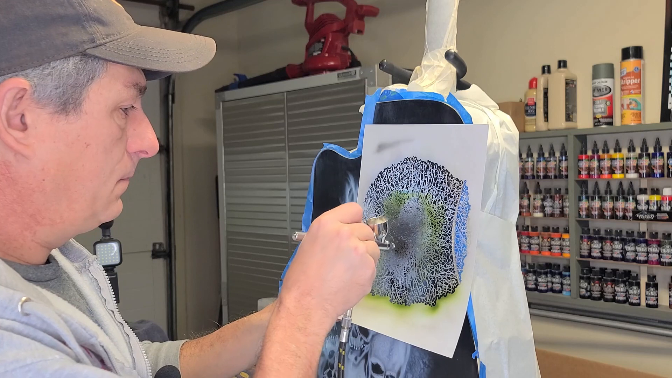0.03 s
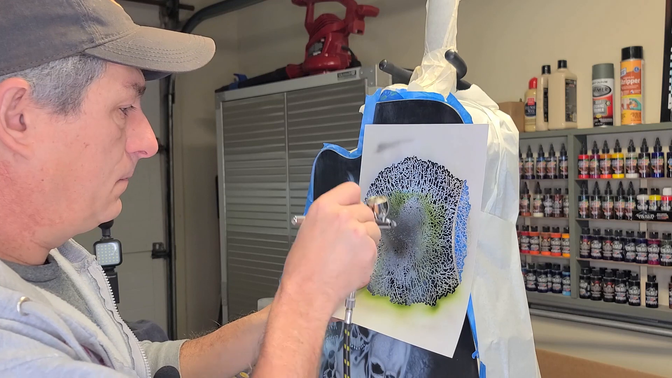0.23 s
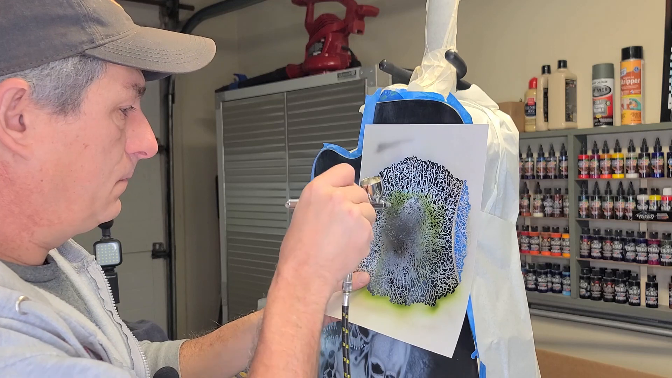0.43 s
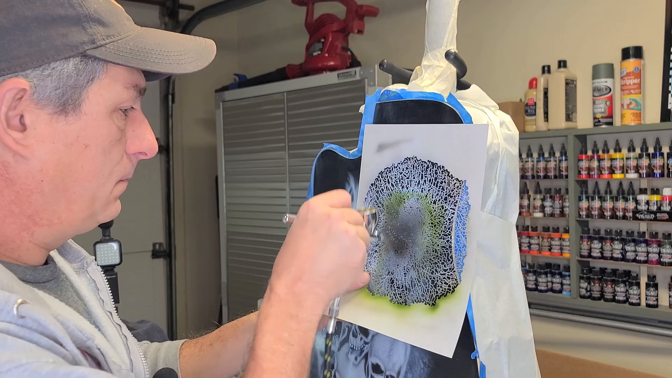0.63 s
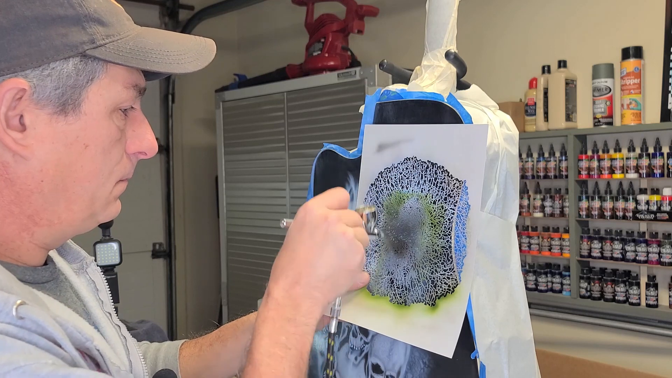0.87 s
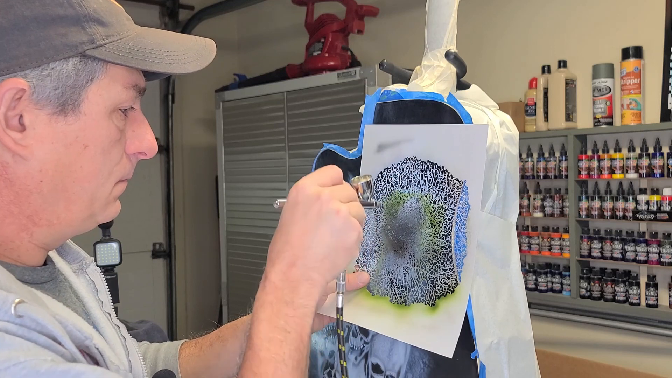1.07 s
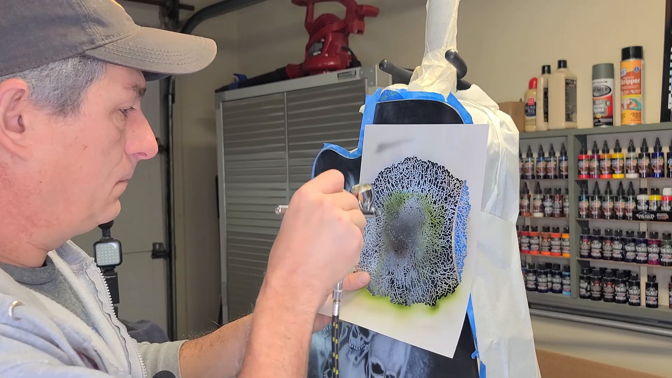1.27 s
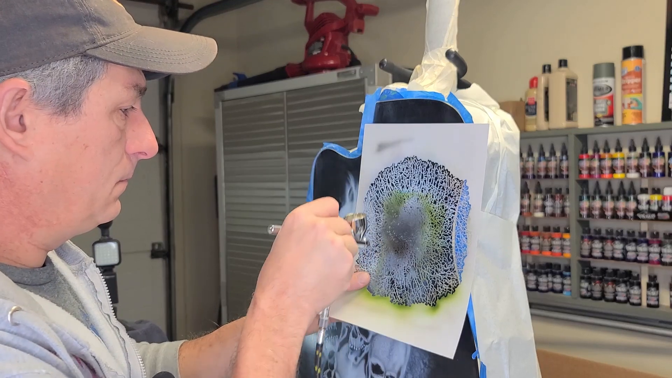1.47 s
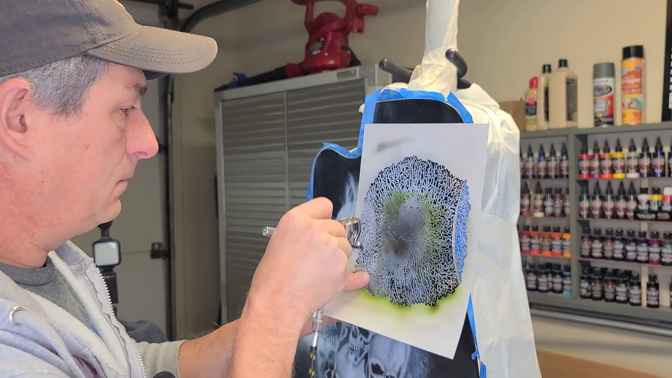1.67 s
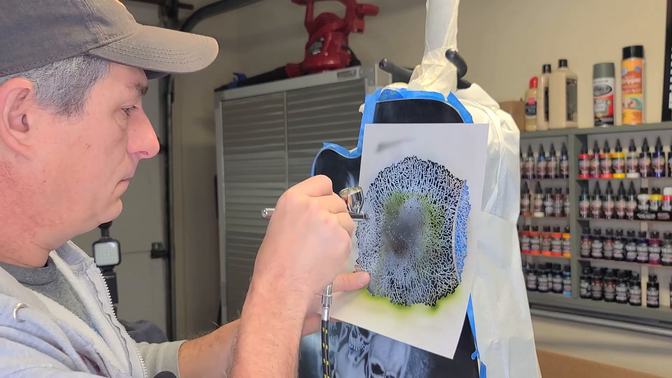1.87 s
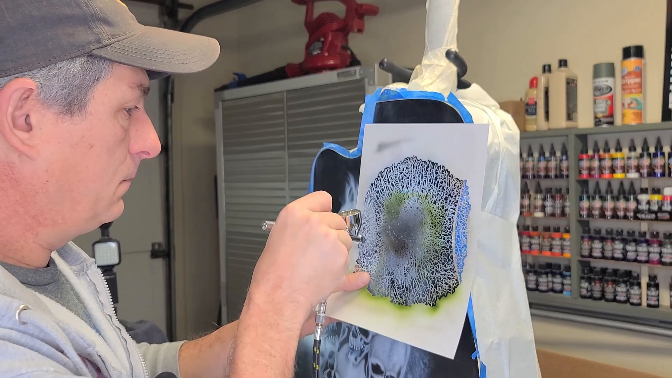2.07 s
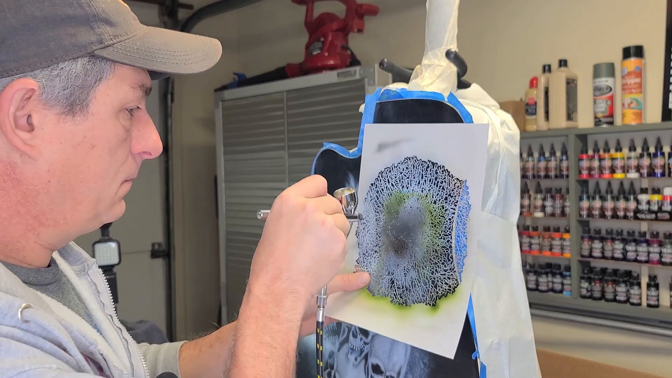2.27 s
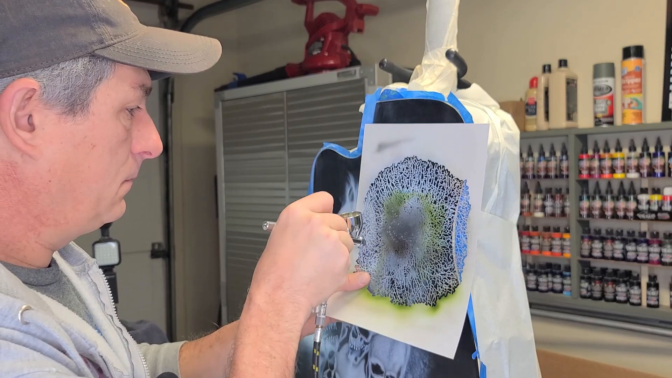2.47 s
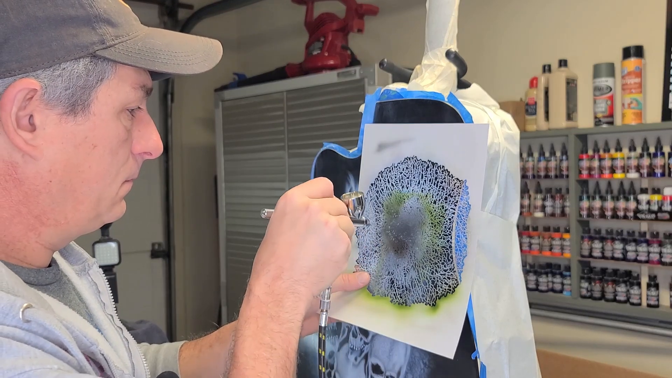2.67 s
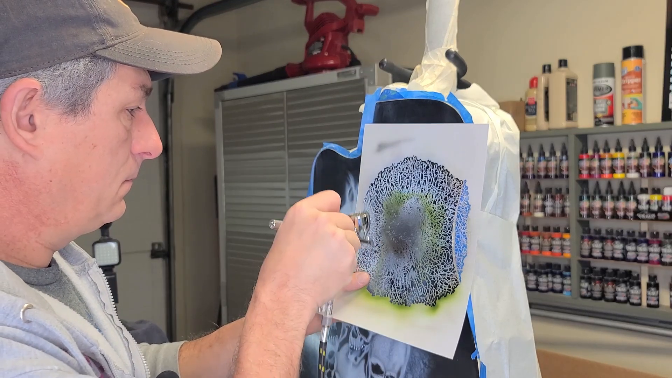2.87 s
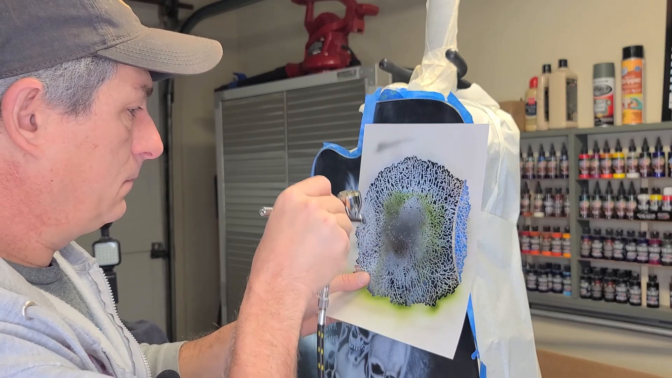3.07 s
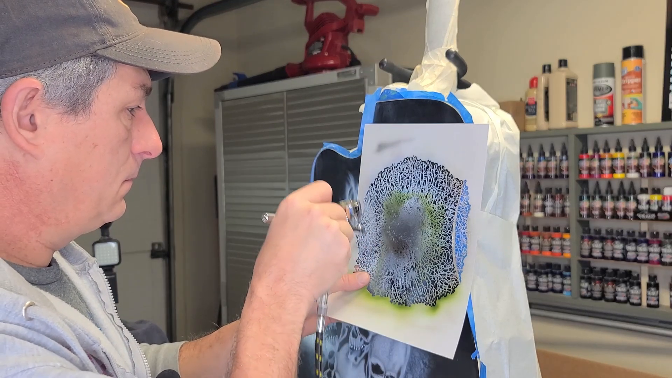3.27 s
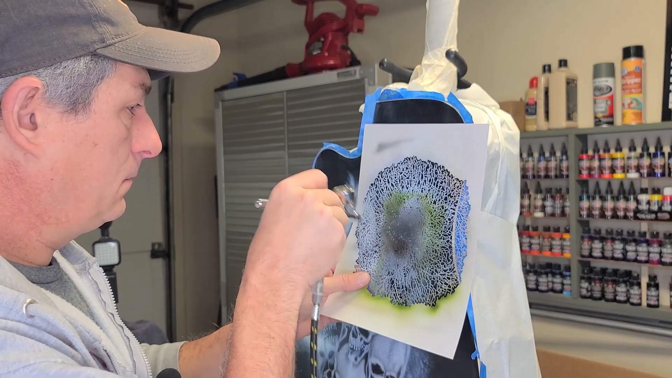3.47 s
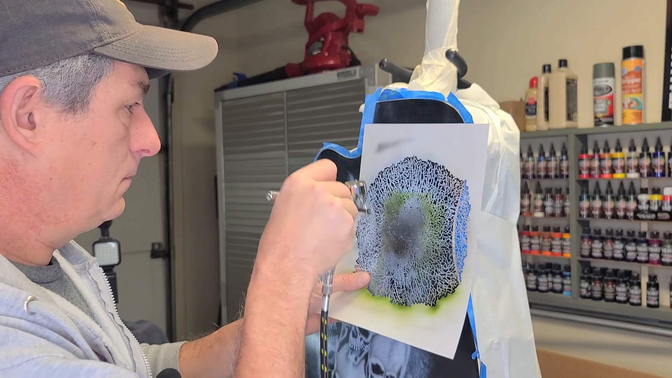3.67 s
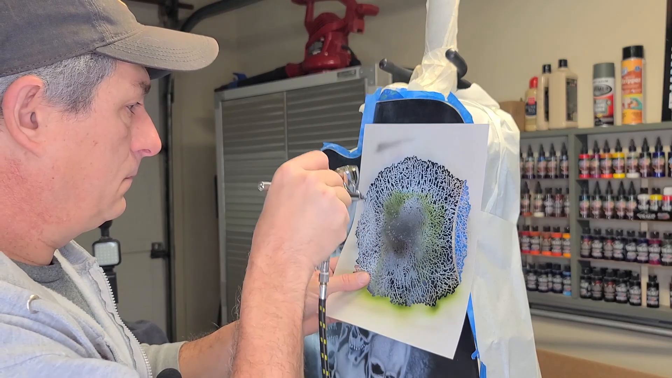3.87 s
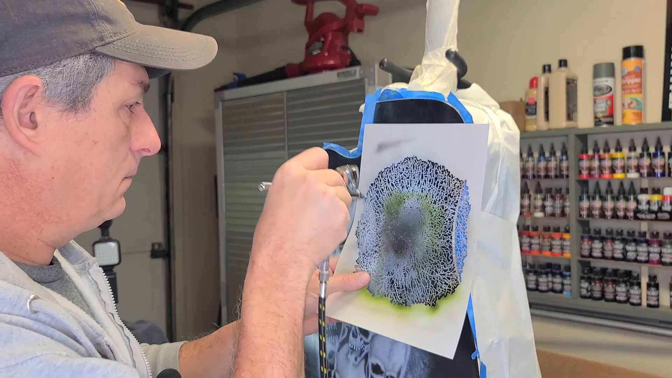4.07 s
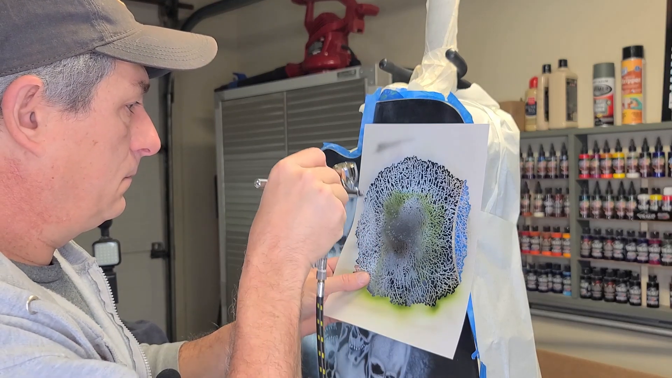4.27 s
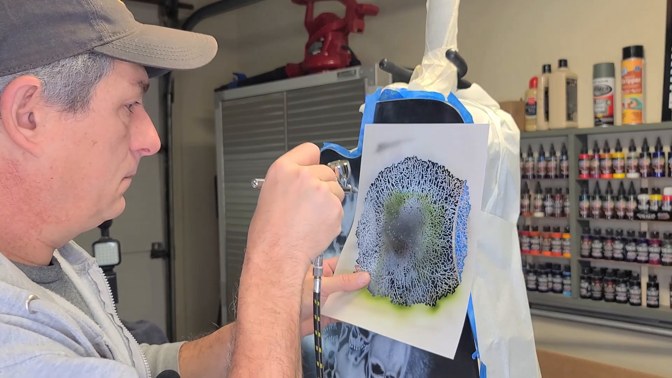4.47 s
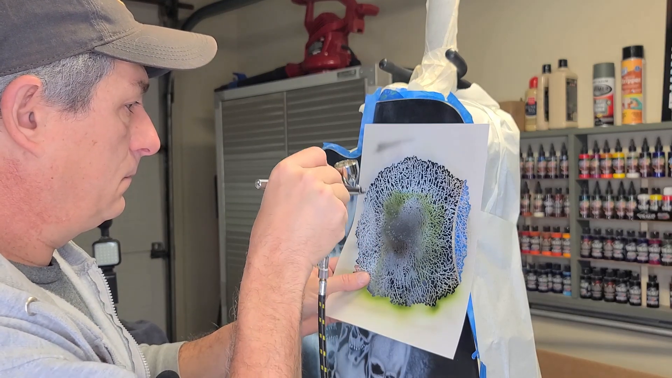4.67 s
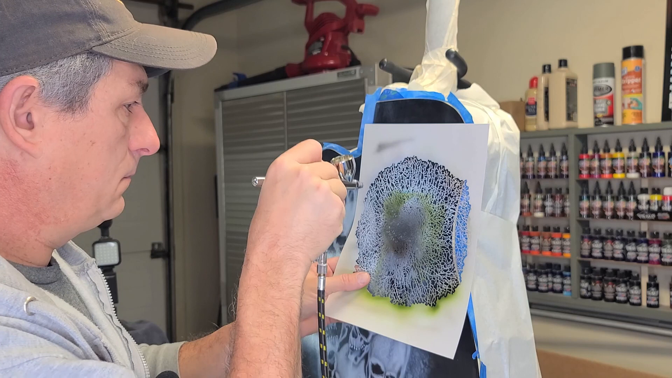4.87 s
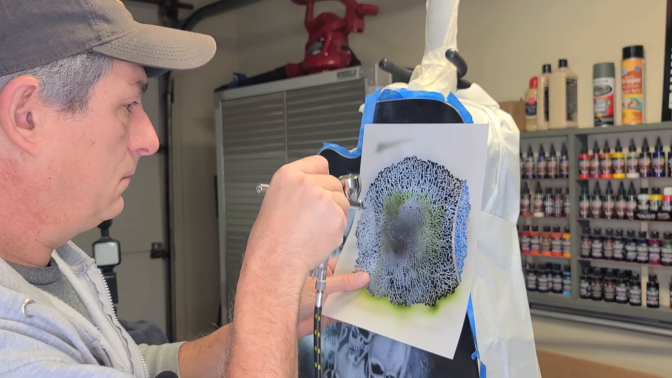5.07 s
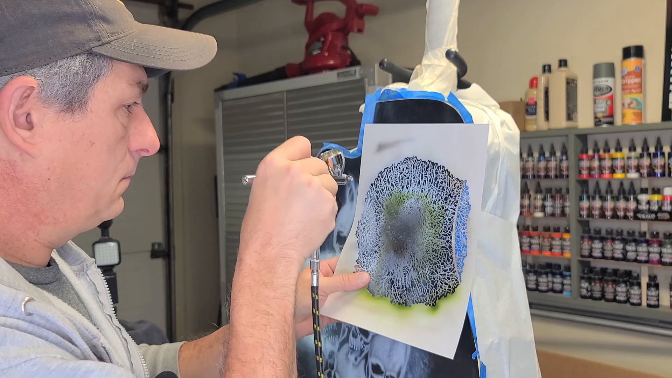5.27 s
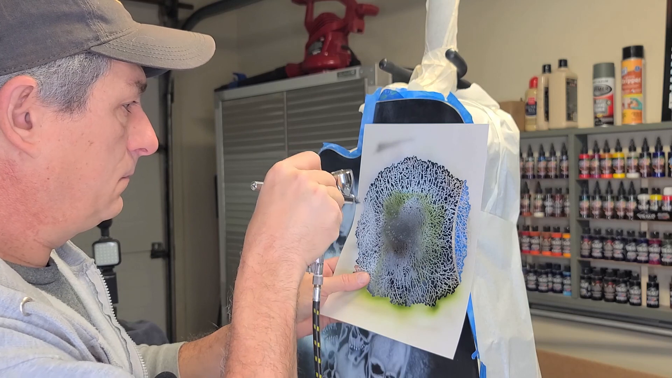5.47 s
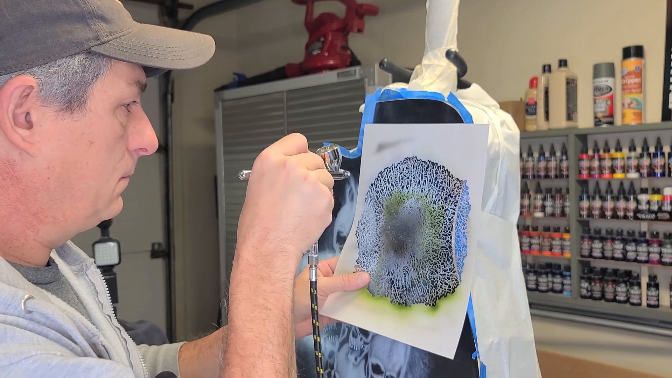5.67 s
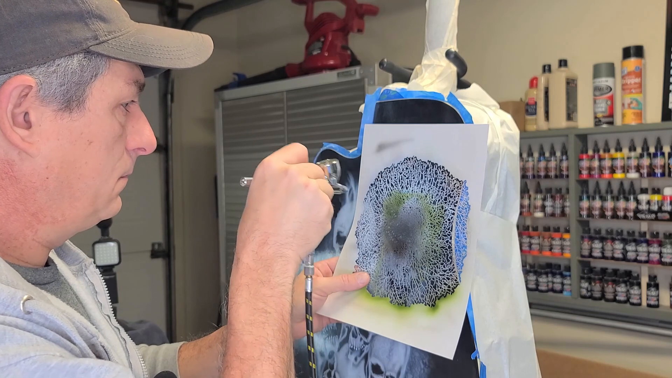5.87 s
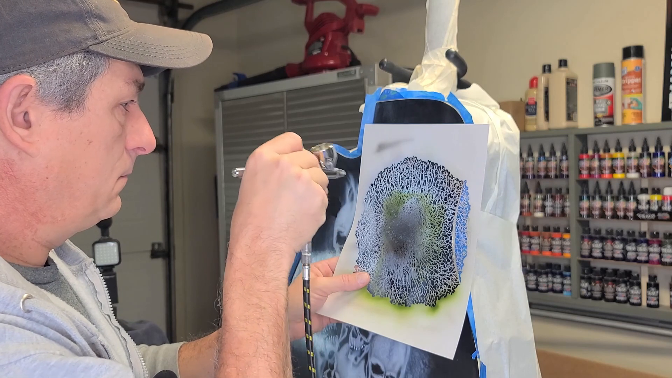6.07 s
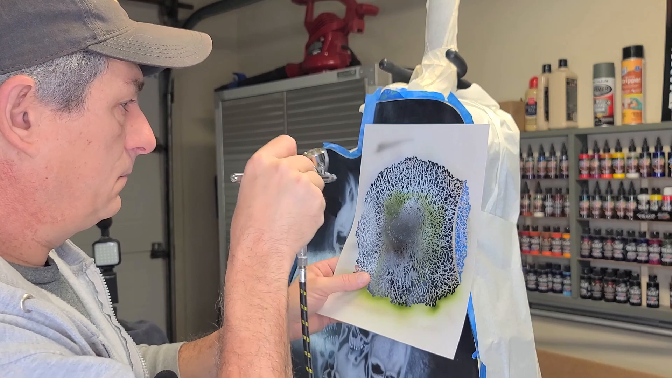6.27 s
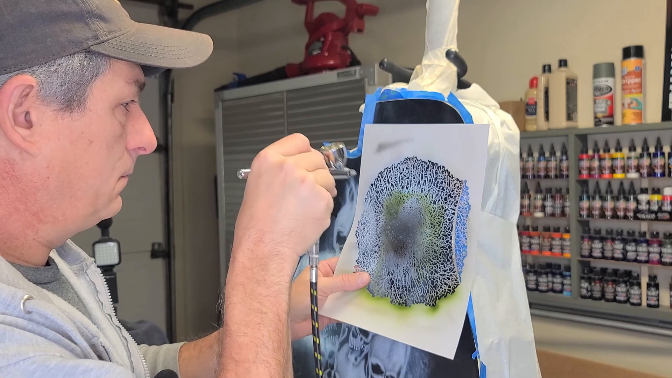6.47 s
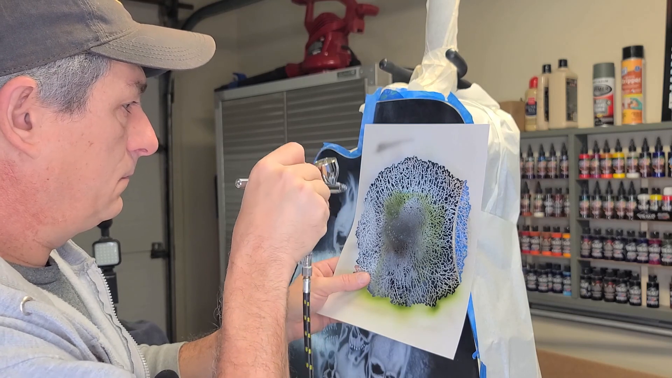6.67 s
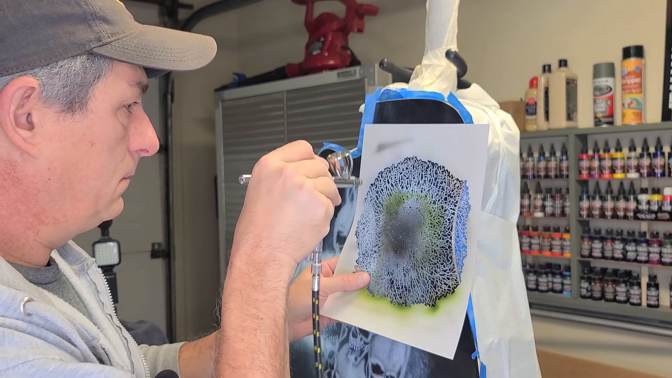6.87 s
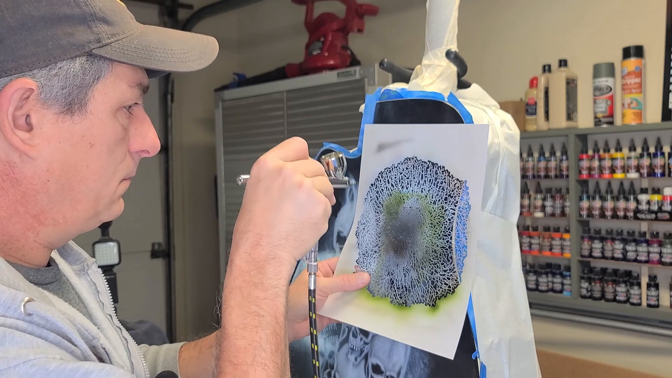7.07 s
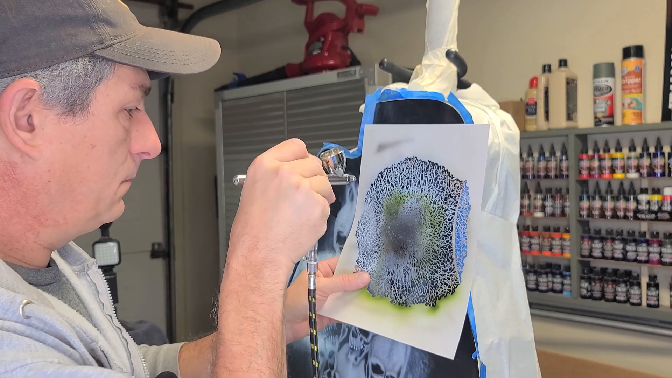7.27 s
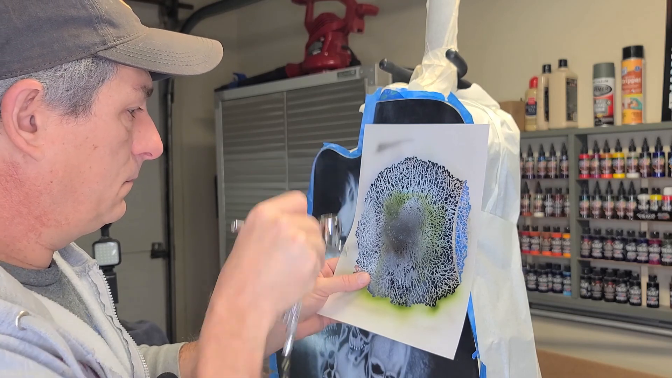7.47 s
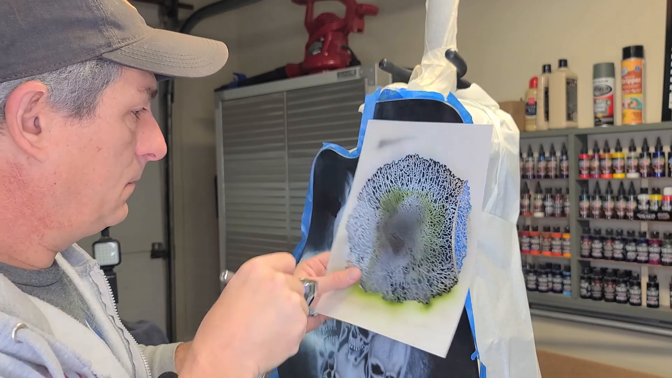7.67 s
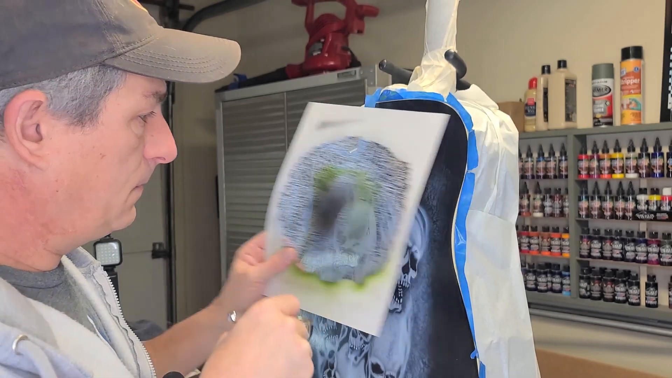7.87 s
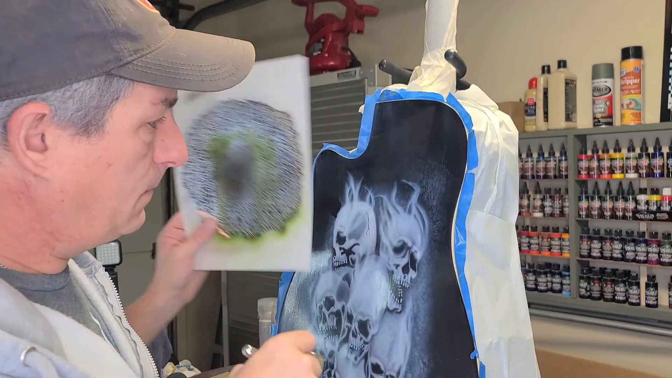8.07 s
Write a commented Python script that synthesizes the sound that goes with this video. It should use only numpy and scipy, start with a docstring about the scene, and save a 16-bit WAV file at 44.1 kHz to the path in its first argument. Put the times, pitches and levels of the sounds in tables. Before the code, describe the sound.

An airbrush gives two short bursts, then hisses in one long, swelling spray against a card stencil in a quiet garage.

```python
"""An airbrush jet hisses along a stencil in a garage: two short trigger bursts, then one long spray.
The turbulent jet radiates broadband noise, which swells each time the hand sweeps it over the
stencil edge. The air breaks up on the card in a sputtering splash and buffets it with low noise.
The garage hums quietly behind, and a small microphone rolls off the top treble."""
import sys
import numpy as np
from scipy import signal
from scipy.fft import rfft, irfft
from scipy.io import wavfile
from scipy.ndimage import uniform_filter1d

SR = 44100
rng = np.random.default_rng(int(sys.argv[2]) if len(sys.argv) > 2 else 0)


def output_pcm(signal):
    """Save a mono or channel-first signal as 16-bit PCM at the path in sys.argv[1].

    Samples are clipped to [-1, 1] before scaling.
    """
    pcm = np.clip(np.atleast_2d(signal).T, -1, 1) * 32767
    wavfile.write(sys.argv[1], SR, np.round(pcm).astype(np.int16))


N = 358617
TIME = np.arange(N) / SR
JET, SPLASH, LOW_EDGE, BUFFET, RUMBLE = 1, 2, 3, 4, 5  # columns of SPRAY_LEVELS


def jet():
    """Turbulence radiates broadband hiss; droplets roughen it by amplitude modulation."""
    hz, t = grid(512)
    spectrum_db = unsteady_bands(jet_spectrum(hz, t), hz, t)
    hiss = noise(spectrum_db, size=512, patchy_db=1.8, patch_hz=400, patch_s=.04, flicker_db=.5)
    droplets = gain_of(1.4 * jitter(N, 60))
    sound = evened(hiss * droplets) + thin_tone()
    return gain_of(stroke(JET, TIME)) * sound * valve(open_s=.0025, shut_s=.0014)


# Spectra of the soft jet and of the hard jet over the edge: f/Hz, relative level/dB
SOFT_SPECTRUM = [(1470, -69), (2500, -24), (3230, -4.5), (3760, -1), (4650, -18), (5250, -7), (6580, -5.5),
                 (7250, -6.5), (8190, 2), (8810, -17.5), (9540, -19), (10100, -35), (10700, -50),
                 (13900, -108), (22000, -120)]
HARD_SPECTRUM = [(1350, -36), (2300, -14.5), (2840, -2), (3380, -4.5), (3820, -8.5), (4380, 1.5), (5450, 1),
                 (6080, -2), (6690, -3), (7330, -3.5), (7970, -3.5), (9540, -16.5), (10700, -35),
                 (13900, -136), (22000, -120)]
# Five resonances of the hiss, and three bands that the sweeps lift or lower: f/Hz, width/Hz
JET_RESONANCES = [(3270, 860), (4470, 350), (5400, 510), (8000, 720), (9500, 530)]
EDGE_BANDS = [(3400, 780), (5400, 220), (6800, 390)]
# Slow turn of the hand: t/s, sheen (a treble peak) f/Hz, sheen lift/dB, lift/dB of each resonance
HAND_TURN = [(0, 6800, 5, -2, -1, -7, -7, -1), (.2, 6800, 6.5, 12.5, -4, 3, 5.5, 2),
             (.5, 6800, 2.5, -6, -2, -8, -9.5, -2), (1.0, 6400, 1.5, -0.5, -3, -3, -2.5, 0),
             (1.3, 6900, 14.5, 2.5, -0.5, 7, -1.5, 11), (1.8, 6280, 5.5, -3.5, -3, -7.5, -3, 2),
             (2.3, 6570, 11.5, 5.5, -1.5, 10.5, 1.5, 11), (2.8, 6350, 8.5, 3.5, 3.5, 4.5, 2, 5),
             (3.3, 6340, 9, 0.5, 0, 2.5, 2, 4), (3.8, 6500, 7.5, 2.5, 8, 3.5, 4, 6.5),
             (4.5, 6650, 6.5, 4, 3.5, 6, 3.5, 4), (5.3, 6600, 1.5, -3.5, 3.5, 0, 0, -1.5),
             (6.1, 6900, 4, 1.5, 0, 0, -0.5, 2.5), (6.9, 6900, 7, -2.5, 2, 1.5, 0.5, 2),
             (7.5, 6470, 3, -5.5, 1.5, -2.5, -2, 1.5), (7.7, 6670, 1, 3.5, -4.5, 1, -2, 0)]
def jet_spectrum(hz, t):
    """Resonances shape a noise spectrum that turns from soft to hard as the jet grows louder."""
    soft_db, hard_db = -78.5, -35  # jet levels at which each spectrum is reached
    hardness = ramp((stroke(JET, t) - soft_db) / (hard_db - soft_db))
    db = read(SOFT_SPECTRUM, hz) * (1 - hardness) + read(HARD_SPECTRUM, hz) * hardness
    for column, (f, width) in enumerate(JET_RESONANCES, start=3):
        db += bump(hz, f, width) * (control(HAND_TURN, column, t) + .66 * drift(t, .13))
    sheen_hz = control(HAND_TURN, 1, t) + 90 * drift(t, .06)
    sheen_db = control(HAND_TURN, 2, t) + 1.8 * drift(t, .077)
    db += bump(hz, sheen_hz, 280) * sheen_db
    for column, (f, width) in enumerate(EDGE_BANDS, start=6):
        db += bump(hz, f, width) * swells(EDGE_SWEEPS, column, t)
    db -= 2.5 * bump(hz, THIN_TONE_HZ, 320)  # the hiss dips around the thin tone
    return db - power_db(db)  # same power in every frame


def unsteady_bands(db, hz, t):
    """Band-wise amplitude modulation: the low edge of the hiss comes and goes, the rest wavers."""
    edge_db = power_db(db[(hz[:, 0] > 2150) & (hz[:, 0] < 2850)])
    db = db + ramp((3200 - hz) / 400) * (stroke(LOW_EDGE, t) + sputter_db(t) - edge_db)
    db += ramp((hz - 6800) / 800) * 2.36 * jitter(len(t), 2)  # the treble flickers
    db += ramp((4200 - hz) / 800) * 2.57 * jitter(len(t), 6)  # the low hiss wavers
    gaps = ramp(jitter(len(t), 2) - 1.6)  # the lower hiss drops out for an instant
    return db - 12 * gaps * ramp((5200 - hz) / 1500)


THIN_TONE_HZ = 7985
def thin_tone():
    """Narrow-band noise is heard as a thin, flickering 8 kHz tone."""
    fading = gain_of(7 * np.tanh(1.5 * jitter(N, 600)))
    level_db = control(HAND_TURN, 6, TIME) - 12.5  # re the hiss; follows the fourth resonance
    return gain_of(level_db) * evened(tone(THIN_TONE_HZ, width_hz=110) * fading)


# Slow course of the spray: t/s, then level/dB of jet, splash (re jet), low edge (re jet), buffet, rumble
SPRAY_LEVELS = [(0.0, -44, -12, -17, -51.5, -62), (0.04, -46.5, -15, -20, -47, -65),
                (0.15, -43.5, -18.5, -19, -52.5, -50), (0.23, -47, -12.5, -19, -45.5, -57),
                (0.36, -50.5, -15, -13, -49, -58), (0.5, -51.5, -16, -18, -48.5, -58),
                (0.8, -49.5, -17.5, -19, -53, -67), (1.2, -54, -20.5, -21.5, -50, -57.5),
                (1.65, -49, -23, -21, -56, -56.5), (2.1, -51.5, -23, -20.5, -56.5, -55),
                (2.8, -49.5, -17.5, -20, -58, -54), (3.3, -50.5, -23.5, -23.5, -50.5, -52),
                (3.7, -51, -24.0, -21, -63, -59.5), (4.4, -53, -21.0, -21.5, -62.5, -57),
                (5.2, -51.5, -22, -21.5, -57, -56), (5.9, -52.5, -23, -23, -63.5, -58),
                (6.4, -55.5, -19, -32.5, -65.5, -62), (7.0, -52.5, -17.5, -23, -62, -59.5),
                (7.4, -53.5, -24.5, -27.5, -60.5, -59.5), (7.7, -49.5, -10, -10, -60.5, -48.5)]
# Sweeps over the stencil edge: peak t/s, rise/s, fall/s, swell/dB of jet, splash and low edge,
# lift/dB of each of the EDGE_BANDS
EDGE_SWEEPS = [(1.055, 0.096, 0.041, 5.5, 2, 4, 3.5, 2, 2.5),
               (1.426, 0.032, 0.066, 5.8, 2.5, -3.5, 2.1, 2, -0.5),
               (1.914, 0.12, 0.035, 4.8, 3.5, 2, 0, 5, 3.3), (2.358, 0.23, 0.028, 5.5, 0.5, -1, 0, -3, 1),
               (2.653, 0.1, 0.075, 4.7, -2.5, 0, -0.8, -2.5, 1.5),
               (3.01, 0.041, 0.13, 5.1, 2.5, 2, 3, 4, 2.1), (3.491, 0.2, 0.036, 3.5, 4.5, 3, 0.5, 0, -1),
               (3.823, 0.068, 0.089, 7.2, 6.5, 4.5, 5, 2, 1),
               (4.255, 0.114, 0.043, 7.8, 0.5, 1.5, -1.4, 3.5, -2),
               (4.584, 0.061, 0.083, 8, 6.5, 7.5, -2.5, -1, -1),
               (4.994, 0.074, 0.041, 7.9, 4, 5.5, -0.9, 2.5, -2),
               (5.378, 0.041, 0.065, 4.5, 4, 4.5, 2, 3, -1.4),
               (5.705, 0.036, 0.063, 8.7, 4.5, 9.5, 0.5, 5.5, -1),
               (6.1, 0.099, 0.051, 9.9, -1, 8.0, -4.5, -1.5, 3.5),
               (6.49, 0.21, 0.048, 6.3, -0.5, 8, -3, -2, 0),
               (6.852, 0.25, 0.071, 4.1, -10, 2.5, -1, -2.5, -1.5),
               (7.199, 0.07, 0.033, 8.4, 2.5, 8.5, 5, 3.5, -1),
               (7.556, 0.075, 0.063, 8.1, -3.0, -9, -4.5, -7, 1.5)]
def stroke(part, t):
    """Gains add in decibels: slow course plus sweeps; the splash also takes a share of each gust."""
    gust_db = .27 * swells(CARD_GUSTS, 3, t) if part == SPLASH else 0
    return control(SPRAY_LEVELS, part, t) + swells(EDGE_SWEEPS, part + 2, t) + gust_db


# Trigger strokes: pressed t/s, released t/s
TRIGGER_PULLS = [(0, 0.051), (0.138, 0.237), (0.354, 7.7)]
def valve(open_s, shut_s):
    """Exponential growth and decay of the flow, which is 1 while the trigger is down."""
    flow = np.zeros(N)
    for start, end in TRIGGER_PULLS:
        rise = np.exp(np.minimum(TIME - start, 0) / open_s)
        fall = np.exp(-np.maximum(TIME - end, 0) / shut_s)
        flow = np.maximum(flow, rise * fall)
    return flow


# Spectrum of the air striking the card: f/Hz, relative level/dB
SPLASH_SPECTRUM = [(600, -29), (850, -0.5), (1150, 6.5), (1500, -0.5), (1800, -9.5), (2100, -16.5),
                   (2500, -30), (3200, -57)]
def splash():
    """Jet impingement: air breaking up on the card radiates a weak, sputtering middle band."""
    hz, _ = grid(256)
    spectrum_db = read(SPLASH_SPECTRUM, hz)
    spatter = noise(spectrum_db, size=256, patchy_db=2.5, patch_hz=900, patch_s=.016, flicker_db=2)
    level_db = stroke(JET, TIME) + stroke(SPLASH, TIME) + sputter_db(TIME)
    return gain_of(level_db) * spatter * valve(open_s=.0034, shut_s=.016)


# Spectra of the shaking card and of the deep rumble: f/Hz, relative level/dB
BUFFET_SPECTRUM = [(60, -41), (110, -7), (140, -5), (200, -3.5), (320, -7), (500, -11.5), (680, -13),
                   (850, -25.5), (1300, -79)]
RUMBLE_SPECTRUM = [(20, -52), (40, -21), (63, 7.5), (90, 0.5), (125, -5), (170, -18.5), (300, -63)]
# Brightness of the buffeting: t/s, lift/dB of its upper band
BUFFET_BRIGHTNESS = [(0, 5), (.5, -2), (1.2, -4), (2.0, -4), (2.9, -5), (3.6, -5.5), (4.4, 4.5), (5.2, -3),
                     (6.0, 12.5), (6.6, 2), (7.1, 2.5), (7.7, -1)]
# Gusts in which the card flaps harder: peak t/s, rise/s, fall/s, swell/dB
CARD_GUSTS = [(1.006, 0.044, 0.025, 3), (1.272, 0.039, 0.052, 4.5), (1.98, 0.1, 0.26, 4),
              (2.66, 0.039, 0.34, 7.5), (2.894, 0.031, 0.15, 4.5), (3.288, 0.021, 0.023, -1),
              (3.773, 0.14, 0.056, 12), (4.122, 0.36, 0.15, 7), (4.445, 0.17, 0.02, 5),
              (4.81, 0.069, 0.1, 8), (5.126, 0.15, 0.054, 9), (6.273, 0.17, 0.069, 5),
              (6.5, 0.037, 0.017, 9.5), (6.653, 0.029, 0.054, 13), (7.004, 0.01, 0.083, 14),
              (7.152, 0.055, 0.095, 12.5), (7.509, 0.062, 0.067, 11)]
def buffeting():
    """Flow-induced vibration: the card and the air around it shake, giving lumpy noise over a rumble."""
    hz, t = grid(1024)
    lift_db = control(BUFFET_BRIGHTNESS, 1, t) - .19 * swells(CARD_GUSTS, 3, t)  # gusts sound duller
    card_db = read(BUFFET_SPECTRUM, hz) + bump(hz, 832, 230) * lift_db
    card = noise(card_db, size=1024, patchy_db=1.5, patch_hz=200, patch_s=.04, flicker_db=1.75)
    card *= gain_of(control(SPRAY_LEVELS, BUFFET, TIME) + swells(CARD_GUSTS, 3, TIME))
    rumble_db = read(RUMBLE_SPECTRUM, grid(2048)[0])
    rumble = noise(rumble_db, size=2048, patchy_db=0, patch_hz=60, patch_s=.05, flicker_db=1.3)
    rumble *= gain_of(control(SPRAY_LEVELS, RUMBLE, TIME))
    return (card + rumble) * valve(open_s=.0043, shut_s=.014)


def dropouts(sound, low_hz=900, high_hz=3050, depth_db=22):
    """In the long spray the middle band drops out in brief patches, more often when weak."""
    hz, t, spectra = signal.stft(sound, SR, nperseg=256, noverlap=192)
    hz = hz[:, None]
    band = ramp(np.minimum(hz - low_hz, high_hz - hz) / 300)
    upper = ramp((hz - 1800) / 500)
    band_db = stroke(JET, t) + (1 - upper) * stroke(SPLASH, t) + upper * stroke(LOW_EDGE, t)
    chance = 1.18 * patches(256, 1300, .009) + .56 * patches(256, 700, .031)
    weakness = .11 * (-72 - band_db) - .4
    holes = ramp(2 * (chance[:, :len(t)] + weakness))
    start, end = TRIGGER_PULLS[-1]
    spectra *= gain_of(-depth_db * band * holes * ((t > start) & (t < end)))
    return signal.istft(spectra, SR, nperseg=256, noverlap=192)[1][:N]


# Spectrum of the room noise: f/Hz, relative level/dB
ROOM_SPECTRUM = [(18, -62), (35, -28), (64, -3), (110, -4.5), (200, -13), (310, -15), (390, -26.5),
                 (1000, -28), (1700, -29), (2400, -35), (2900, -27), (5700, -28.5), (7000, -35.5),
                 (10000, -56), (22000, -120)]
# Hum tones of the room: f/Hz, width/Hz, level/dB
HUM_TONES = [(240, 4, -64), (63, 8, -69), (1000, 3, -85), (1249, 3, -86)]
def garage(air_db=-61):
    """Ambient noise: a continuous spectrum whose treble flickers, with a few spectral lines of hum."""
    hz, t = grid(512)
    treble_db = ramp((hz - 2500) / 4000) * 3.9 * jitter(len(t), 3)
    spectrum_db = read(ROOM_SPECTRUM, hz) + treble_db
    air = noise(spectrum_db, size=512, patchy_db=1.5, patch_hz=800, patch_s=.006, flicker_db=.3)
    return gain_of(air_db) * air + sum(gain_of(db) * hum(f, width) for f, width, db in HUM_TONES)


def hum(hz, width_hz):
    """Interference of a steady sine with narrow-band noise makes a wavering tone."""
    steady = np.sqrt(2) * np.sin(2 * np.pi * (hz * TIME + rng.random()))
    return evened(steady + 2.4 * tone(hz, width_hz))


def tone(hz, width_hz):
    """A narrow resonance passes only the noise near its own frequency."""
    pole = np.exp(-np.pi * width_hz / SR)
    carrier = np.exp(2j * np.pi * hz * TIME)
    envelope = rng.standard_normal(N) / carrier
    for _ in range(2):
        envelope = signal.lfilter([1 - pole], [1, -pole], envelope)
    return evened((carrier * envelope).real)


def noise(spectrum_db, size, patchy_db, patch_hz, patch_s, flicker_db):
    """Fourier synthesis of shaped noise of rms 1, with random patches and a flicker common to all bins."""
    hz, t = grid(size)
    real, imaginary = rng.standard_normal((len(t), len(hz), 2)).T
    flicker = jitter(len(t), 3)
    db = spectrum_db + patchy_db * patches(size, patch_hz, patch_s) + flicker_db * flicker
    spectra = (real + 1j * imaginary) * gain_of(db)
    return evened(signal.istft(spectra, nperseg=size, noverlap=size - size // 4)[1][:N])


def patches(size, patch_hz, patch_s):
    """A random field of rms 1, correlated over one patch in frequency and time."""
    hz, t = grid(size)
    field = rng.standard_normal((len(t), len(hz))).T
    field = uniform_filter1d(field, max(1, round(patch_hz / hz[1, 0])), axis=0)
    return evened(uniform_filter1d(field, max(1, round(patch_s / t[1])), axis=1))


def jitter(count, span):
    """A moving average correlates random values over span steps; rms 1."""
    return evened(uniform_filter1d(rng.standard_normal(count), span))


def drift(t, span_s):
    """A slow random fluctuation with correlation time span_s."""
    return np.interp(t * 200, np.arange(2000), jitter(2000, round(span_s * 200)))


def sputter_db(t):
    """Random level modulation, heard as sputtering."""
    return 2 * drift(t, span_s=.04)


def swells(events, column, t):
    """Superposed bells in dB, each with its own rise and fall."""
    rows = np.array(events)[:, :, None]
    late = t - rows[:, 0]
    span_s = np.where(late < 0, rows[:, 1], rows[:, 2])
    return np.sum(rows[:, column] * np.exp(-abs(late / span_s) ** 2.4), 0)  # flatter than a Gaussian


def control(table, column, t):
    """Linear interpolation of one column in time."""
    rows = np.vstack(table)
    return np.interp(t, rows[:, 0], rows[:, column])


def read(spectrum, hz):
    """Interpolation of levels over logarithmic frequency."""
    f, db = np.transpose(spectrum)
    return np.interp(np.log(hz + 1), np.log(f + 1), db)


def grid(size):
    """Bin frequencies (a column) and frame times (a row) of short-time spectra with 75% overlap."""
    hop = size // 4
    return np.fft.rfftfreq(size, 1 / SR)[:, None], np.arange(N // hop + 5) * hop / SR


def bump(hz, centre_hz, width_hz):
    """A Gaussian peak of height 1."""
    return np.exp(-.5 * ((hz - centre_hz) / width_hz) ** 2)


def power_db(db):
    """Incoherent bins add in power: the total level of each frame."""
    return 10 * np.log10(np.sum(gain_of(db) ** 2, 0))


def ramp(x):
    return np.clip(x, 0, 1)


def gain_of(db):
    return 10 ** (np.asarray(db) / 20)


def evened(x):
    """Normalisation to rms 1."""
    return x / np.sqrt(np.mean(x ** 2) + 1e-20)


def scene():
    """Superposition: the sources add in one channel, whose middle band then drops out in patches."""
    return dropouts(jet() + splash() + buffeting() + garage())[None]


# Frequency response of the small microphone: f/Hz, level/dB
MIC_RESPONSE = [(10, -30), (42, -5), (90, 0), (10060, 0), (10160, -6), (10900, -8), (11300, -30),
                (22000, -40)]
def record(dry):
    """A microphone is a band-pass filter: it cuts deep bass and top treble and adds faint self-noise."""
    response = gain_of(read(MIC_RESPONSE, np.fft.rfftfreq(2 * N, 1 / SR)))
    coloured = irfft(rfft(dry, 2 * N) * response)[:, :N]
    self_noise = gain_of(-89.5) * rng.standard_normal(dry.shape)
    band_limit = signal.firwin(511, cutoff=15720, window=("kaiser", 9), fs=SR)
    return signal.oaconvolve(coloured + self_noise, band_limit[None], "same")


dry = scene()
out = record(dry)
output_pcm(out)
```